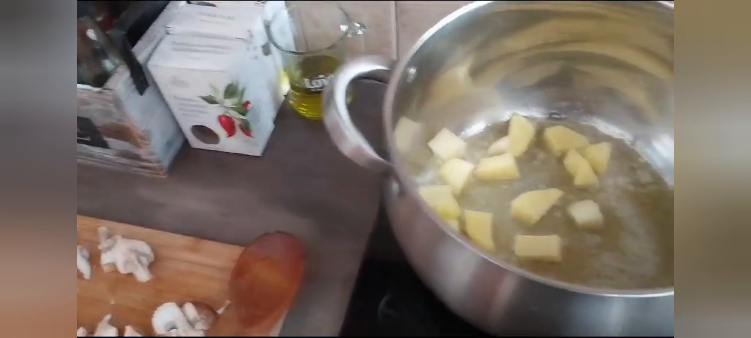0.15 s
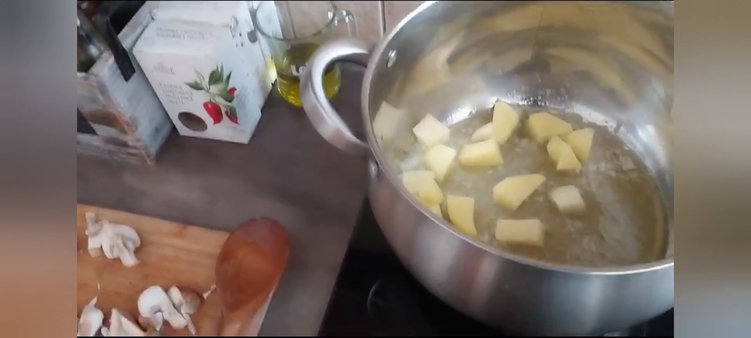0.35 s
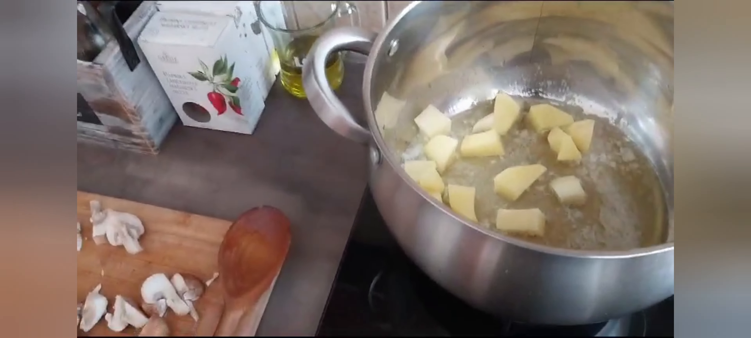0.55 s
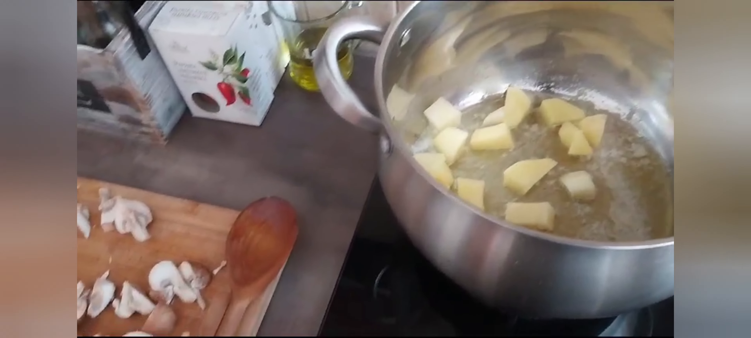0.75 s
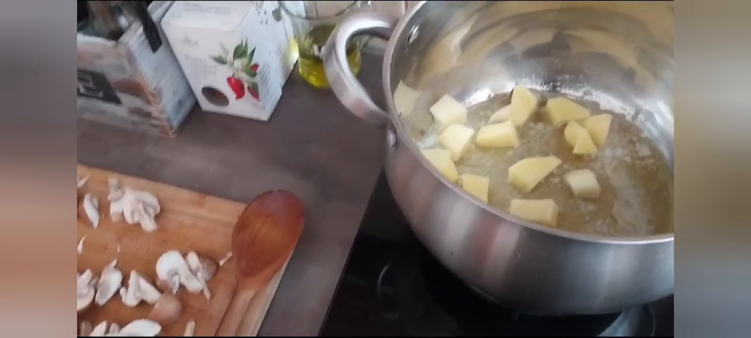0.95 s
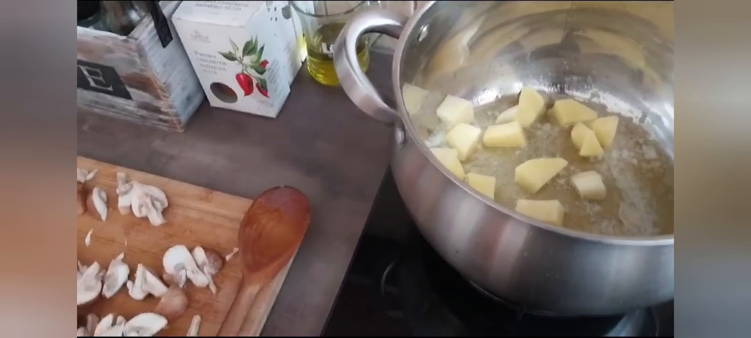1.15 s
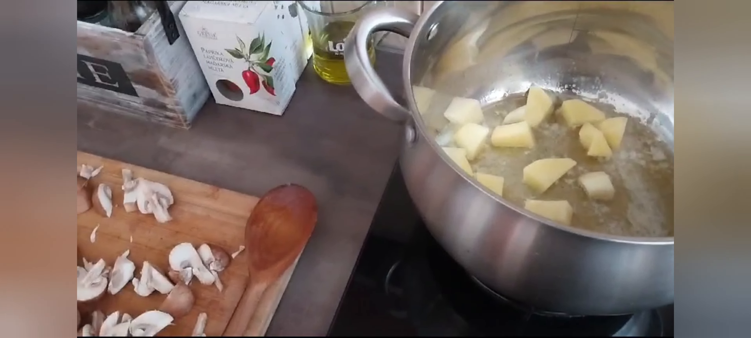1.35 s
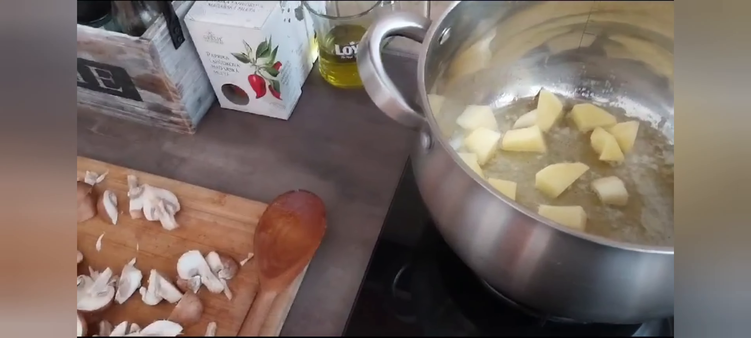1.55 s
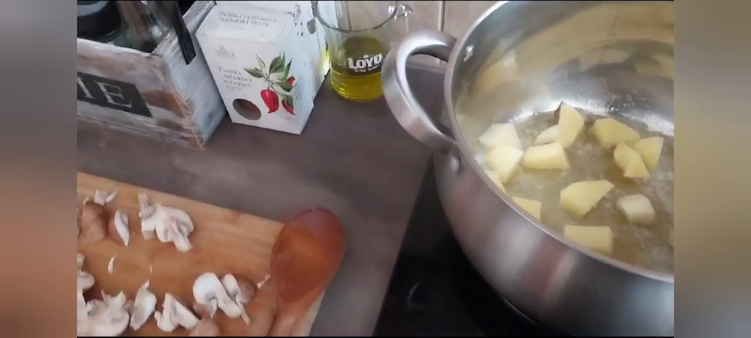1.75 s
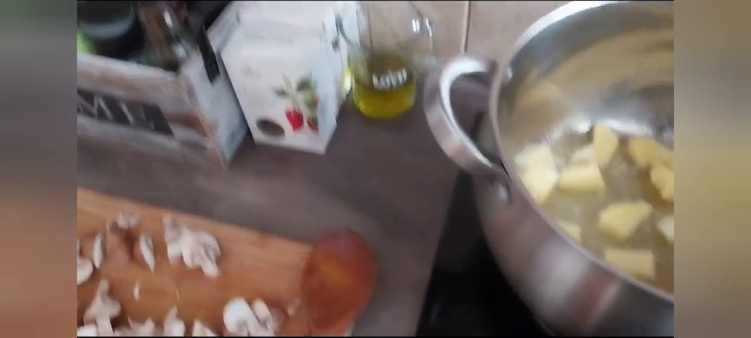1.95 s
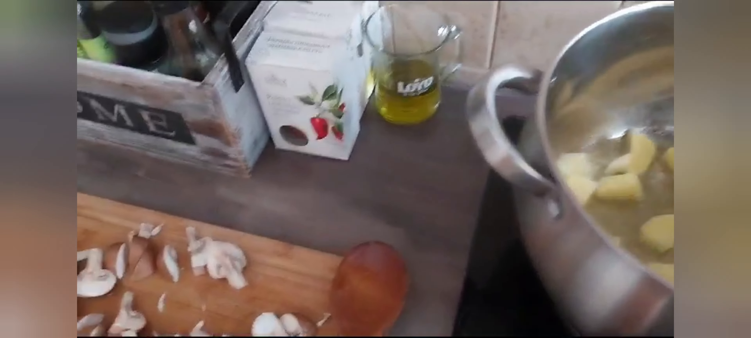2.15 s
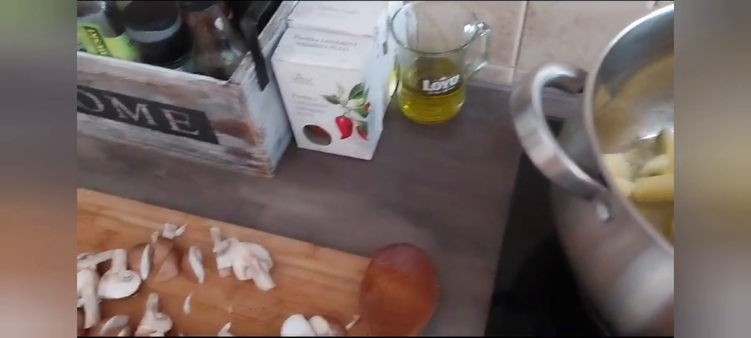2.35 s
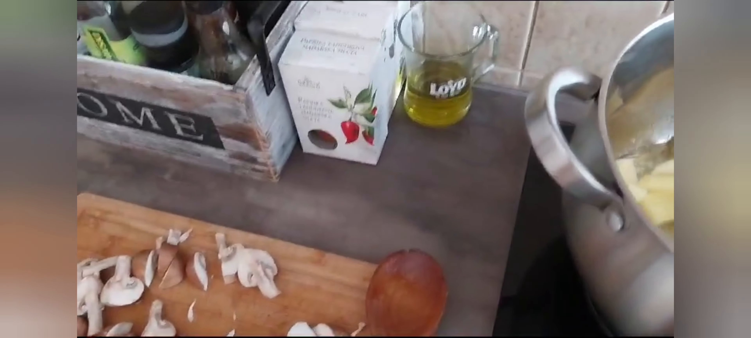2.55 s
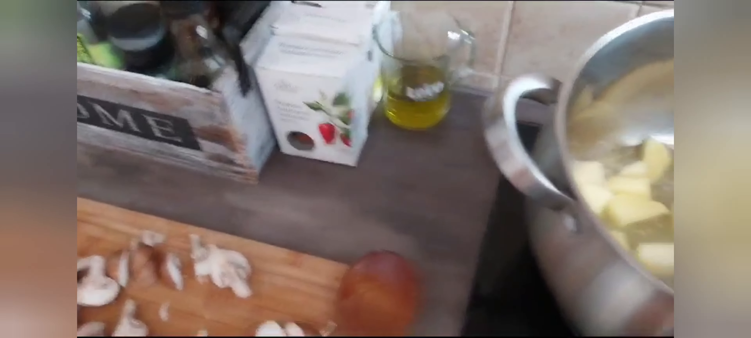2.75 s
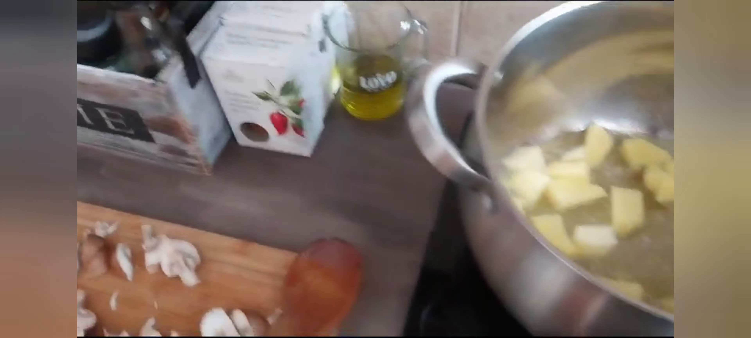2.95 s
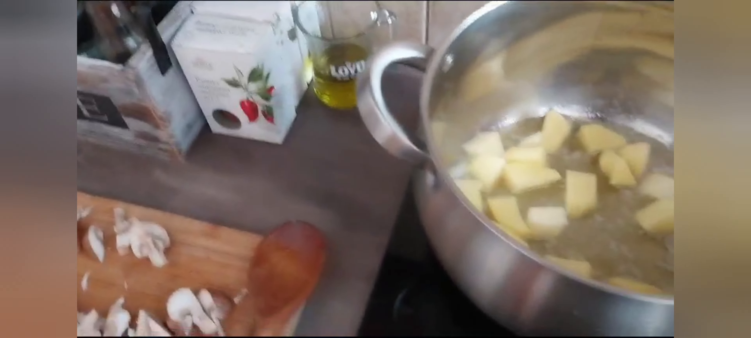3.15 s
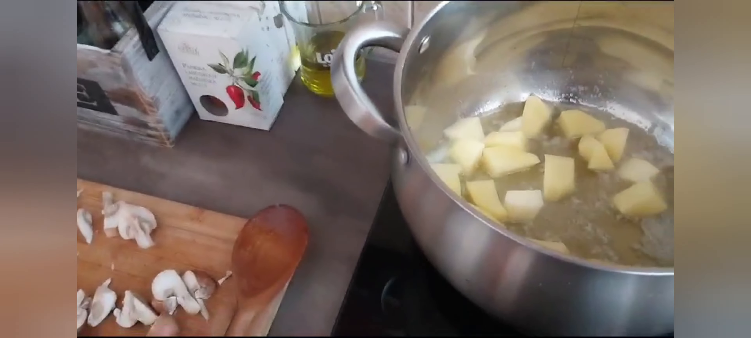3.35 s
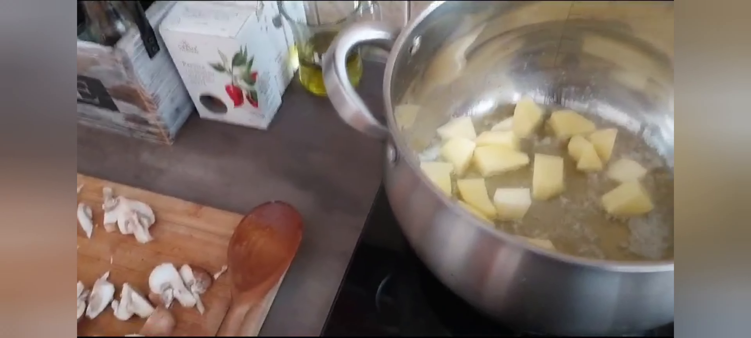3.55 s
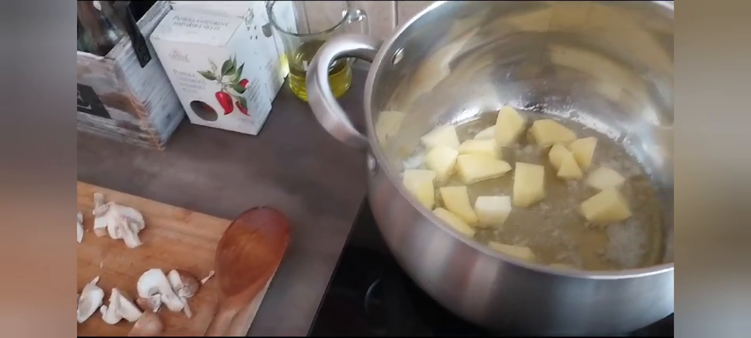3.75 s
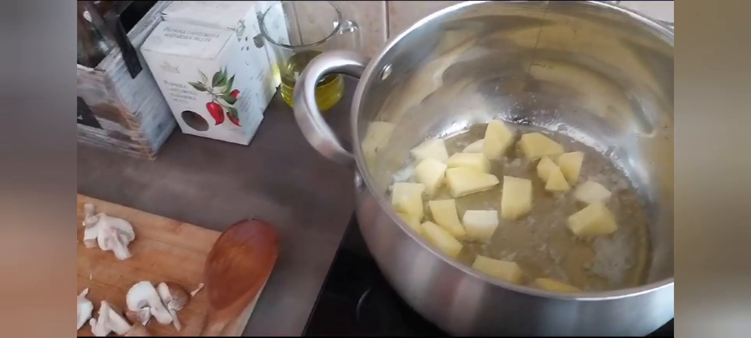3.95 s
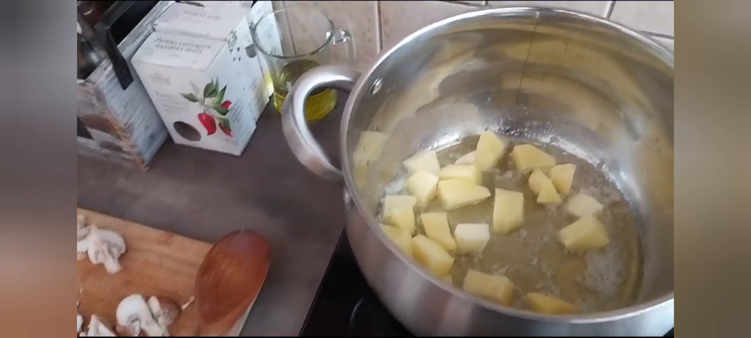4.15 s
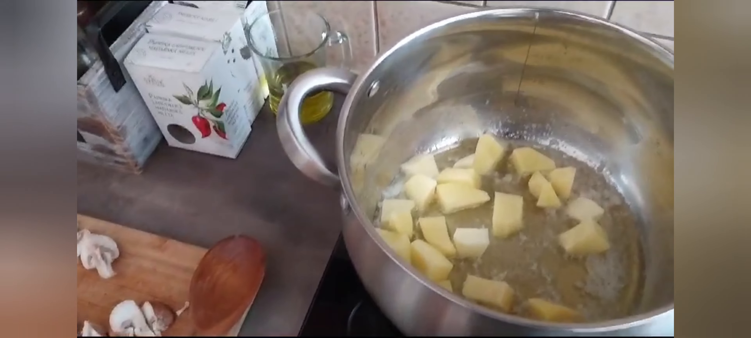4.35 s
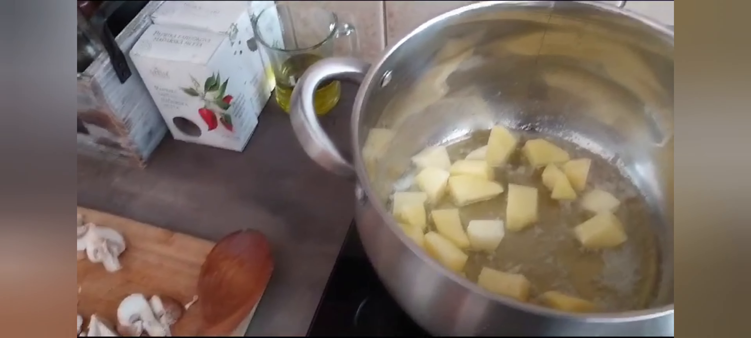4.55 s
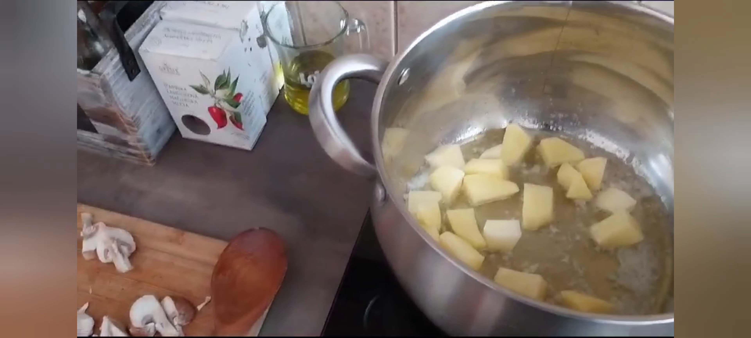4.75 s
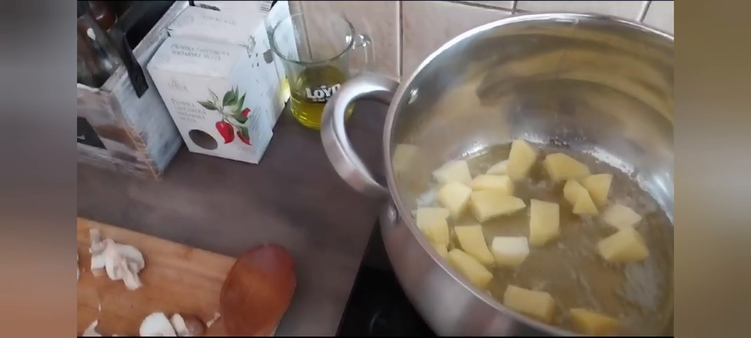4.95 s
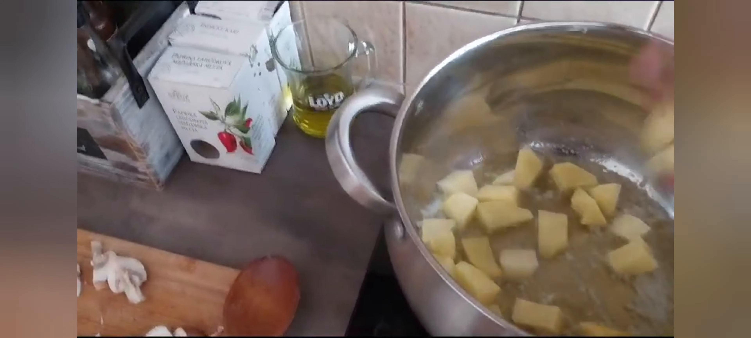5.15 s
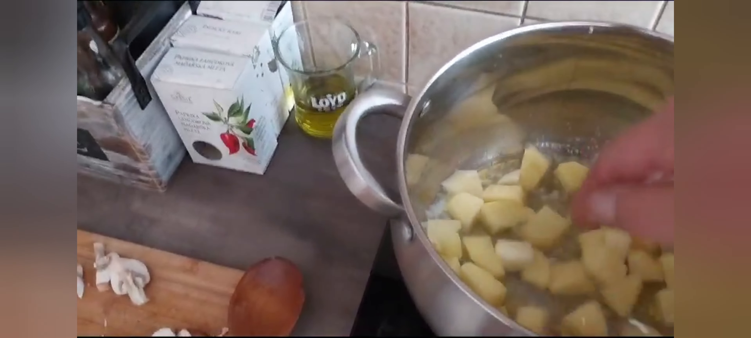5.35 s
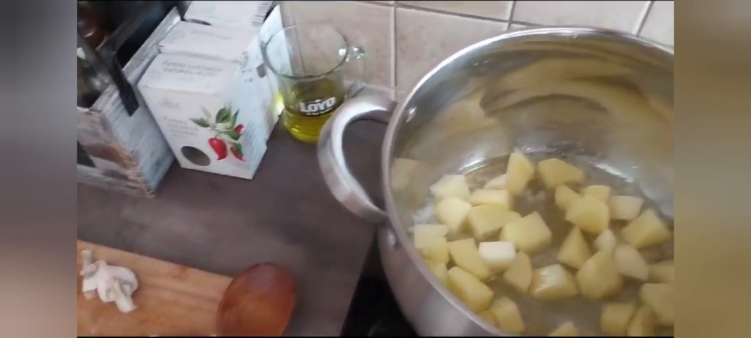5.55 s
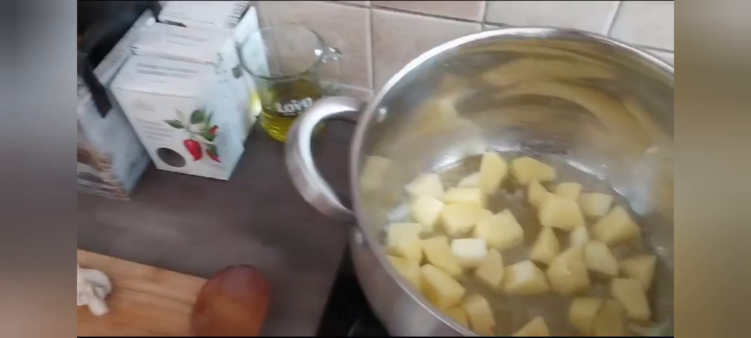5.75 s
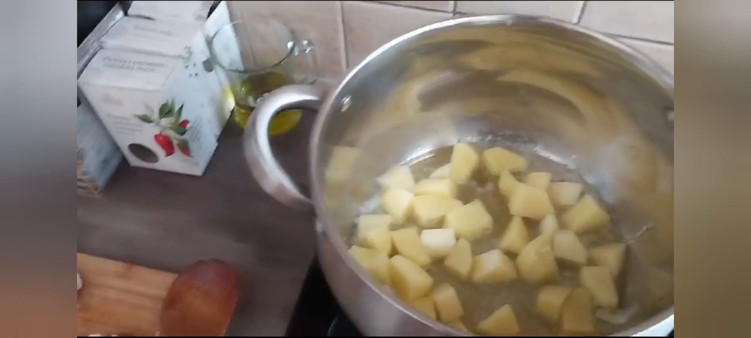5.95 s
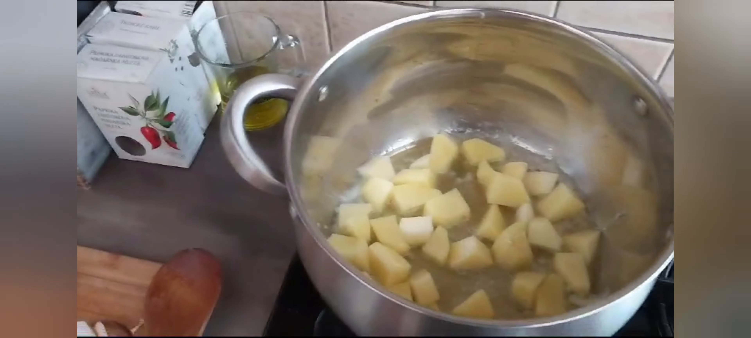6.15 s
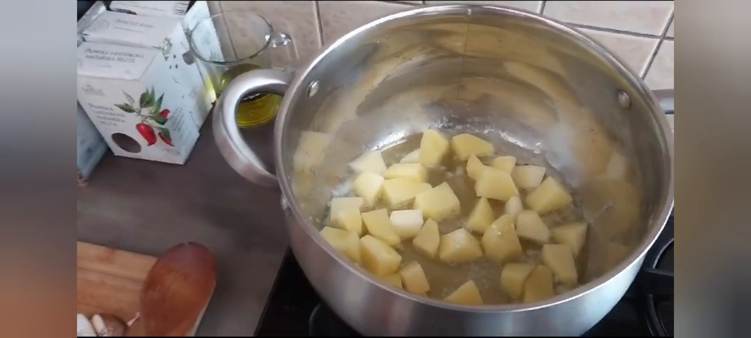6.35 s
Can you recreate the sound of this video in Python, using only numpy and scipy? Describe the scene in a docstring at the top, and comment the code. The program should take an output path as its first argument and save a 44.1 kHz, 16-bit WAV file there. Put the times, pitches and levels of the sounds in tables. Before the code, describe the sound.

Heard near the pot in stereo, a light frying sizzle runs throughout with fine spray and occasional sharp spits. A hand gathers potato dice with dull, resonant knocks and soft rustling. Two wet handfuls thump into the buttered steel, roughly a third of the way in and near the end, each flashing into a short crackling hiss and raising the sizzle. The kitchen adds short echoes and a quiet bassy hum.

```python
"""In a small kitchen, diced potato sizzles in butter in a steel pot, heard from close by.
Steam bubbles are random noise bursts that ring in the pot's hollow, and now and then the fat spits.
A hand gathers more pieces with dull knocks that ring the pot's resonances, and drops them in with thuds.
Each wet handful flares into a crackling hiss and the frying grows; below it all lies a low steady drone."""
import sys
import numpy as np
from scipy import signal
from scipy.fft import rfft, irfft, next_fast_len
from scipy.io import wavfile

SR = 44100
rng = np.random.default_rng(int(sys.argv[2]) if len(sys.argv) > 2 else 0)


def pcm_store(signal):
    """Save signal as 16-bit PCM."""
    levels = np.round(np.clip(np.atleast_2d(signal), -1, 1) * 32767)
    wavfile.write(sys.argv[1], SR, levels.astype(np.int16).T)


N = 282681
TIME = np.arange(N) / SR  # seconds
TAPS = 16384  # length of filters and blows, in samples
HZ = np.fft.rfftfreq(TAPS, 1 / SR)

# Ways the pot rings on its hob and worktop.
# Each row: frequency in Hz, width in Hz, strength in dB.
POT_MODES = [(61, 9.7, 6), (105.6, 20.7, 6.5), (152.5, 12, -8.5), (257.3, 26, 2.5), (356.5, 19.4, -2.5),
             (477, 6.8, -30), (553, 11, -11.5), (897, 39, -7.5), (1010, 74, -5), (1110, 98, -16.5),
             (1380, 340, -12.5), (1592, 11, -4), (1940, 96, -13), (2940, 420, -24)]
# Moments when each handful meets the fat: a plain list of times in seconds.
HANDFUL_STARTS = [2.351, 5.298]
SPIT_SIDE_DB = -7  # left minus right


def amp(db):
    """Turns decibels into gain."""
    return 10 ** (np.asarray(db) / 20)


def unit(x):
    """Scales a sound to an rms (average strength) of 1."""
    return x / np.sqrt(np.mean(x ** 2) + 1e-20)


def read(points, hz=HZ):
    """Reads a spectrum table, joined by straight lines on a log-frequency axis."""
    f, value = np.transpose(points)
    return np.interp(np.log(hz + 1), np.log(f), value)


def pan(db):
    """Left and right gains for a level difference of left minus right."""
    return amp([[db / 2], [-db / 2]])


def add(mix, s, sound):
    """Mixes a stereo sound in at time s, cut off at the end of the mix."""
    part = mix[:, max(round(s * SR), 0):][:, :sound.shape[1]]
    part += sound[:, :part.shape[1]]


def wander(count):
    """A random curve of about unit size, joining count points over the whole scene."""
    return np.interp(TIME, np.linspace(0, TIME[-1], count), rng.standard_normal(count))


def resonances(modes):
    """Gain against frequency of a set of resonances, their powers added."""
    power = 0
    for hz, width, db in modes:
        detuning = (HZ ** 2 - hz ** 2) / (width * (HZ + 1))
        power = power + amp(db) ** 2 / (1 + detuning ** 2)
    return np.sqrt(power)


def colour(x, gain):
    """Filters with the given gain; nothing sounds early, and peaks ring on after each click."""
    # folding the cepstrum forward in time gives the minimum-phase filter
    cepstrum = irfft(np.log(np.maximum(gain, 1e-5)))
    cepstrum[1:TAPS // 2] *= 2
    cepstrum[TAPS // 2 + 1:] = 0
    response = irfft(np.exp(rfft(cepstrum)))[None, :TAPS // 2]
    return signal.fftconvolve(x, response, axes=1)[:, :x.shape[1]]


def diffuse(size):
    """Noise at two close microphones: alike in the bass, mostly unrelated in the treble."""
    # How alike left and right are. Each row: frequency in Hz, likeness from 0 to 1.
    alike = [(60, 1), (250, 0.8), (600, 0.62), (1200, 0.52), (2500, 0.23)]
    a, b = rfft(rng.standard_normal((2, next_fast_len(size, True))))
    same = np.clip(read(alike, np.linspace(0, SR / 2, len(a))), -1, 1)
    right = same * a + np.sqrt(1 - same ** 2) * b
    return irfft(np.array([a, right]))[:, :size]


def room_tone(level_db=-62):
    """The kitchen's low steady drone: noise shaped mostly into bass."""
    # Colour of the drone. Each row: frequency in Hz, gain in dB.
    drone_colour = [(20, -16), (55, -9), (80, -18), (105, 7), (160, -14), (300, -12), (450, -16),
                    (2000, -37)]
    return amp(level_db) * unit(colour(diffuse(N), amp(read(drone_colour)))) * pan(-4.0)


def rummage(bumps_per_s=45, rub=1.46):
    """Pieces rubbing and bumping under the hand softly stir the pot's resonances."""
    # Spells of rustling. Each row: start in seconds, length in seconds, level in dB.
    spells = [(0.122, 0.052, -32.5), (0.4, 0.07, -51), (0.568, 0.57, -46.5), (1.264, 0.066, -48.5),
              (1.473, 0.035, -49), (1.604, 0.091, -42.5), (3.093, 0.78, -45), (3.413, 0.5, -47),
              (4.447, 0.12, -48), (6.044, 0.51, -54.5), (6.253, 0.09, -41)]
    # Colour of the rustling. Each row: frequency in Hz, gain in dB.
    rustle_colour = [(25, -41), (50, -5), (110, 0.5), (330, -3), (650, 7), (800, -10.5), (3000, -40)]
    attack_s, release_t60, rest_db = 0.084, 0.83, -67  # t60: seconds to fade by 60 dB
    effort = amp(rest_db)
    for s, length, db in spells:
        release_db = -60 * np.maximum(TIME - s - length, 0) / release_t60
        attack = np.clip((TIME - s) / attack_s, 0, 1)
        effort = np.maximum(effort, attack * amp(db + release_db))
    bumps = np.tanh(rng.standard_normal(N)) * (rng.random(N) < bumps_per_s / SR)
    push = unit(bumps) + rub * diffuse(N)
    stir = colour(push, resonances(POT_MODES) * amp(read(rustle_colour)))
    return unit(stir) * effort * pan(-2.5)


def clinks(side_db=-6):
    """Light ticks against steel: a few high tones ring briefly after each."""
    # The ticks. Each row: start in seconds, level in dB.
    ticks = [(0.145, -47), (0.175, -50), (2.988, -38)]
    # Tones of the steel. Each row: frequency in Hz, level in dB, time to fade by 60 dB in seconds.
    steel = [(2845, 12, 0.046), (3120, 3.5, 0.069), (4040, -1, 0.043)]
    out, t = np.zeros((2, N)), np.arange(TAPS) / SR
    for s, db in ticks:
        ring = 0
        for hz, mode_db, t60 in steel:
            tone = np.sin(2 * np.pi * (hz * t + rng.random((2, 1))))
            ring = ring + amp(mode_db - 60 * t / t60) * tone
        add(out, s, amp(db) * pan(side_db) * ring)
    return out


def arrivals(lag_s=0.00033, contact_hz=2600):
    """A blow's direct sound and first echoes; they reach the right microphone before the left."""
    # Echoes off the pot wall and the tiles. Each row: delay in seconds, left gain, right gain.
    echoes = [(.0019, 0.13, 0.32), (.0031, 0.081, 0.082), (.0049, 0.18, 0.12), (.0083, 0.28, 0.48)]
    taps = np.zeros((2, TAPS))
    direct = (0.0022, 0.67, 0.97)
    for delay, left, right in [direct] + echoes:
        s = delay * (1 + rng.uniform(-1, 1) / 20)  # each piece lands in another spot
        taps[0, round((s + lag_s) * SR)] += left
        taps[1, round(s * SR)] += right
    # potato is soft: the push lasts a fraction of a millisecond
    return signal.sosfilt(signal.butter(3, contact_hz, fs=SR, output="sos"), taps)


def blow(low_db, hard_db, ring_hz, core_db, room_db, ring_db=-15, thud_width_hz=130, ring_width_hz=20,
         room_t60=0.48, boom_db=-26, boom_t60=0.35, boom_rise=0.0016, boom_hz=330):
    """One blow and its echoes ring the pot: soft blows boom, hard ones clack; the peak is scaled to 1."""
    t = np.arange(TAPS) / SR
    push = arrivals() + diffuse(TAPS) * amp(room_db - 60 * t / room_t60)
    # the room's bass builds up over boom_rise seconds, then fades
    boom = diffuse(TAPS) * amp(boom_db - 60 * t / boom_t60) * (1 - np.exp(-t / boom_rise))
    push += signal.sosfilt(signal.butter(2, boom_hz, fs=SR, output="sos"), boom)
    contact_db = read([
        (25, low_db - 18.5), (55, low_db - 6.0), (170, low_db - 4.0),
        (450, ring_db), (ring_hz + 60, ring_db),
        (790, hard_db - 8), (1000, hard_db), (3500, hard_db - 1.5), (9000, hard_db + 2.5)])
    # the main ring is a short thud with a longer core
    main_ring = [(ring_hz, thud_width_hz, 0), (ring_hz, ring_width_hz, core_db)]
    sound = colour(push, resonances(POT_MODES + main_ring) * amp(contact_db))
    return sound / np.abs(sound).max()


def knocks():
    """The hand knocks pieces about; a piece left alone topples just after with a softer, boomier bump."""
    # Hard knocks. Each row: start in seconds, level in dB, hardness in dB.
    hits = [(0.002, -9, -7), (0.02, -14.5, -19.5), (0.155, -20, -10), (0.173, -21.5, -13.5),
            (0.75, -37, -22), (0.792, -31.5, -28), (0.928, -27, -11.5), (0.944, -29.5, -9),
            (1.078, -25.5, -20.5), (1.314, -33.5, -19), (1.333, -31.5, -15.5), (1.517, -42, -26),
            (1.594, -34, -20), (1.734, -28, -20.5), (1.764, -25.5, -9), (2.944, -6.5, -10.5),
            (2.952, -10, -17), (2.987, -16.5, -27.5), (3.054, -23.5, -12), (3.13, -21, 12),
            (3.525, -11, -8.5), (3.624, -21.5, -20), (3.67, -22, -10), (4.2, -17, -13), (4.248, -23.5, -19),
            (4.39, -25, -15.5), (4.448, -22.5, -26), (4.469, -21, -26.5), (4.515, -26, -16),
            (4.545, -22, -21.5), (4.615, -26, -11), (6.024, -31, -13.5)]
    ring_hz, boom_db, side_db = 622, -19, 0  # main ring, bass, left minus right
    topple_s, topple_db = 0.042, -13.5  # average delay, level against the knock
    topple_boom_db, topple_hard_db, topple_hz = -7.5, -17, 630
    out = np.zeros((2, N))
    starts = [row[0] for row in hits] + [np.inf]
    for (s, db, hard_db), next_s in zip(hits, starts[1:]):
        gain = amp(db) * pan(side_db)
        late = 1 + rng.standard_normal() / 10
        add(out, s, gain * blow(boom_db, hard_db, ring_hz, core_db=6.5, room_db=-36.5))
        if next_s - s > topple_s:
            topple = blow(topple_boom_db, topple_hard_db, topple_hz, core_db=-9.0, room_db=-39)
            add(out, s + topple_s * late, gain * amp(topple_db) * topple)
    return out


def landings():
    """Pieces tumble into the pot: the first slap the bottom, later ones thump on the pile."""
    # Thuds into the buttered pot. Each row: start in seconds, level in dB.
    thuds = [(2.352, -13.5), (2.374, -20.5), (2.416, -17.5), (2.468, -16), (2.482, -16.5), (2.502, -19.5),
             (2.53, -22.5), (2.58, -21.5), (3.007, -21), (5.299, -20), (5.318, -10.5), (5.343, -14.5),
             (5.38, -15.5), (5.493, -24.5), (5.555, -27.5)]
    ring_hz, hard_db, side_db = 523, -25, 1  # the fat cushions them: a lower, duller ring
    boom_db, pile_boom_db, pile_s = -18, 5.5, 0.024  # thuds boom more as pieces pile up
    out = np.zeros((2, N))
    for s, db in thuds:
        since_handful = min(abs(s - start) for start in HANDFUL_STARTS)
        pile = 1 - np.exp(-since_handful / pile_s)
        hz = ring_hz * (1 + 0.019 * rng.standard_normal())
        thud = blow(boom_db + pile_boom_db * pile, hard_db, hz, core_db=-15.0, room_db=-35.5)
        add(out, s, amp(db) * pan(side_db) * thud)
    return out


def radiate(x):
    """The pot sends its ringing unevenly towards the two microphones."""
    # Lean of the ringing. Each row: frequency in Hz, left minus right in dB.
    lean = [(110, -0.5), (260, -2.5), (500, -1.5), (640, -5), (850, -2.5), (1300, 2)]
    half_db = read(lean) / 2
    return np.vstack([colour(x[:1], amp(half_db)), colour(x[1:], amp(-half_db))])


def burst(hz, octaves, ring_t60, tail_db, tail_t60, size=4096):
    """One bursting bubble: a band of noise that rattles between the steel walls, then in the room."""
    t, f = np.arange(size) / SR, np.fft.rfftfreq(size, 1 / SR)
    band = 1 / (1 + (np.log2((f + 1) / hz) / octaves) ** 2)
    noise = unit(irfft(rfft(rng.standard_normal((2, size))) * band))
    return noise * (amp(-60 * t / ring_t60) + amp(tail_db - 60 * t / tail_t60))


def bubbles(low_hz, high_hz, per_s, spread_db, ring_t60, tail_db=-10, clump_db=1.0, patch_db=-0.5,
            octaves=0.54, count=32):
    """Random bursts, mostly tiny, a few large; they come in clumps, and each pitch waxes and wanes."""
    size_db = spread_db * np.minimum(rng.exponential(1, N), 4.5)
    size = amp(size_db + clump_db * wander(count=200)) * rng.choice([-1, 1], N)
    train = size * (rng.random(N) < per_s / SR)
    kind = rng.integers(0, count, N)  # which pitch each burst has
    out = np.zeros((2, N))
    for k, hz in enumerate(np.geomspace(low_hz, high_hz, count)):
        pop = burst(hz, octaves, ring_t60=ring_t60, tail_db=tail_db, tail_t60=0.5)
        at = np.flatnonzero((kind == k) & (train != 0))
        clicks = np.zeros((1, N))
        clicks[0, at] = train[at] * amp(patch_db * wander(count=70)[at])
        out += np.sqrt(hz) * signal.oaconvolve(clicks, pop, axes=1)[:, :N]
    return unit(out)


def flares():
    """Water on fresh pieces flashes to steam: a sudden crackling hiss that dies away."""
    # Wet pieces meeting hot fat. Each row: start in seconds, hiss level in dB, treble lift in dB.
    flashes = [(2.35, -36, -1.5), (2.468, -37, -13.5), (2.948, -37, -34), (5.298, -31.5, 3.5),
               (5.336, -37.5, -0.5), (5.41, -54, 7)]
    # Colour of the hiss. Each row: frequency in Hz, gain in dB.
    hiss_colour = [(700, 14.5), (1500, -4), (3000, -2), (7000, -0.5), (8700, -9.5), (12000, 0.5),
                   (16000, 2.5)]
    fade_t60 = 0.72  # seconds to fade by 60 dB
    out = np.zeros((2, N))
    crackle = bubbles(1160, 11800, per_s=1200, spread_db=6.5, ring_t60=0.0017)
    for s, db, lift_db in flashes:
        gain = amp(read(hiss_colour) + read([(4000, 0), (12000, lift_db)]))
        one_second = crackle[:, round(s * SR):][:, :SR]
        hiss = unit(colour(one_second, gain))
        add(out, s, amp(db - 60 * TIME[:hiss.shape[1]] / fade_t60) * hiss)
    return out


def spits():
    """The loudest spits of fat and wet slaps: single large bursts of noise."""
    # The spits. Each row: start in seconds, level in dB, centre frequency in Hz.
    pops = [(0.0034, -26.5, 3320), (0.2144, -33, 8100), (0.7946, -36.5, 3400), (1.3264, -37, 3530),
            (1.5963, -32.5, 11400), (2.188, -41, 15000), (2.3536, -32, 5450), (2.4815, -28, 4640),
            (2.604, -27, 12500), (2.7022, -34, 3660), (2.9465, -23.5, 3470), (2.9906, -25.5, 3130),
            (3.286, -27, 6300), (4.999, -36, 6600), (5.2992, -25, 14600), (5.3024, -26, 6900),
            (5.4086, -27.5, 12500)]
    out = np.zeros((2, N))
    for s, db, hz in pops:
        pop = burst(hz, octaves=0.59, ring_t60=0.018, tail_db=-25, tail_t60=0.23, size=TAPS)
        add(out, s, amp(db) * pan(SPIT_SIDE_DB) * pop)
    return out


def frying_strength():
    """Gain of the sizzle: it swells after each handful, less as the pot gets crowded."""
    start_db, handful_db, warm_up_s = -49.5, 3, 0.3  # at first; gain from a handful; how fast it comes
    crowding = 0.068  # each further handful adds this share of the gain of the one before
    warm = 0
    for k, s in enumerate(HANDFUL_STARTS):
        warm = warm + crowding ** k * (1 - np.exp(-np.maximum(TIME - s, 0) / warm_up_s))
    return amp(start_db + handful_db * warm)


def sizzle(crackle_db=-9, stray_db=-67, wash=0.7, mist=0.61, deep_hz=1400, deep_growth=2.1):
    """Steam bubbles ring in the pot's hollow over a smooth wash; near ones crackle, the finest spray."""
    # Colour of the frying. Each row: frequency in Hz, gain in dB.
    sizzle_colour = [(380, -47), (520, 2.5), (630, 0.5), (780, -18.5), (1000, 2), (1350, -4), (1900, -6),
                     (2800, -3), (5200, 0), (7300, -3.5), (8400, -12.5), (10000, -6.5), (16000, -29)]
    # Colour of the fine spray. Each row: frequency in Hz, gain in dB.
    spray_colour = [(4000, -49), (7500, 2), (8700, -20), (10500, -5), (13000, -2.5), (16000, -7.5)]
    # Air resonances of the pot's hollow. Each row: frequency in Hz, width in Hz, dB over the broad sound.
    hollow = [(1053, 45, 7.5), (1630, 63, 9), (2036, 210, 7.5), (2600, 86, 3.5), (3230, 260, 2.5)]
    spray_db, spray_db_per_s = -52.5, -0.93  # the spray slowly dries up
    strength = frying_strength()
    body = bubbles(1426, 8280, per_s=1700, spread_db=3.0, ring_t60=0.091, patch_db=3.0, octaves=0.23)
    body = body + wash * diffuse(N)
    body = unit(colour(body, amp(read(sizzle_colour)) * np.hypot(1, resonances(hollow))))
    # large, deep bubbles grow faster than the rest as the frying gets stronger
    deep = signal.sosfiltfilt(signal.butter(3, deep_hz, fs=SR, output="sos"), body)
    body = body + deep * ((strength / strength.mean()) ** deep_growth - 1)

    crackle = bubbles(3200, 8000, per_s=150, spread_db=3.8, ring_t60=0.014, tail_db=-24, count=12)
    crackle = unit(colour(crackle, amp(read(sizzle_colour))))
    frying = (body + amp(crackle_db) * crackle) * strength

    spray = bubbles(6870, 15900, per_s=810, spread_db=5.0, ring_t60=0.019, clump_db=4.2, patch_db=4.0,
                    octaves=0.54, count=24)
    spray = unit(colour(spray + mist * diffuse(N), amp(read(spray_colour))))
    spray = spray * amp(spray_db + spray_db_per_s * TIME)

    # a few small spits a second
    stray = bubbles(4000, 13000, per_s=8, spread_db=1.5, ring_t60=0.03, tail_db=-22, count=8)
    return frying * pan(-1.05) + spray * pan(-4.0) + amp(stray_db) * stray * pan(SPIT_SIDE_DB)


def scene():
    """Adds up everything heard at the two microphones."""
    background = room_tone() + rummage() + clinks()
    pieces = radiate(knocks() + landings())
    return background + pieces + flares() + spits() + sizzle()


def record(dry):
    """Removes the highest treble with a steep low-pass filter."""
    edge_hz = 15950
    low_pass = signal.firwin(511, edge_hz, window=("kaiser", 9), fs=SR)
    return signal.oaconvolve(dry, low_pass[None], "same")


dry = scene()
out = record(dry)
pcm_store(out)
```